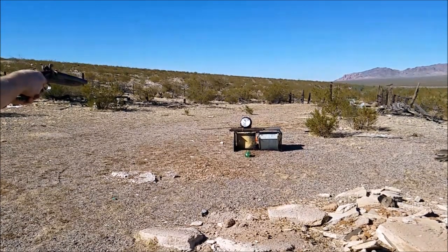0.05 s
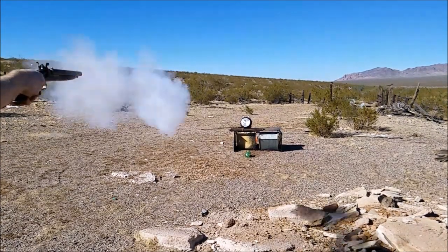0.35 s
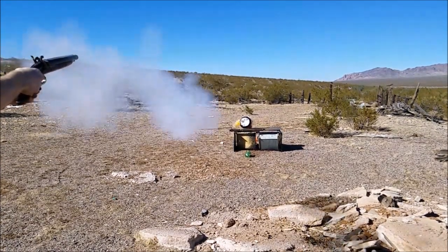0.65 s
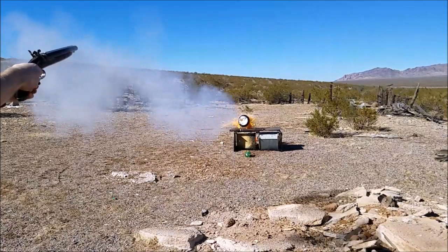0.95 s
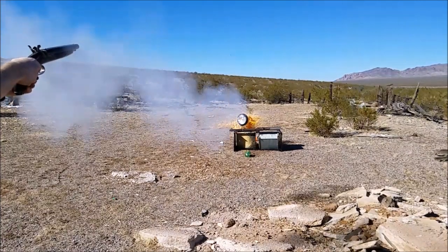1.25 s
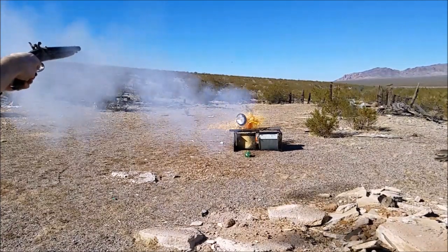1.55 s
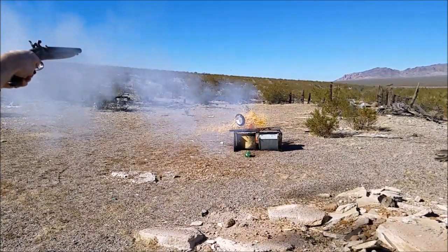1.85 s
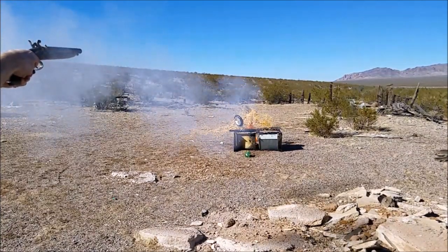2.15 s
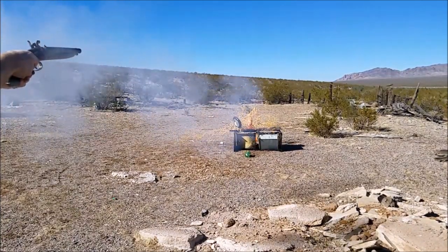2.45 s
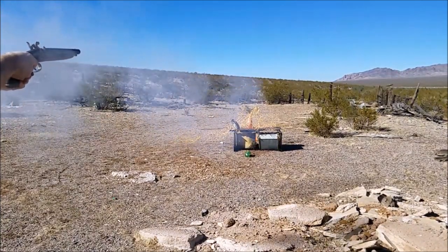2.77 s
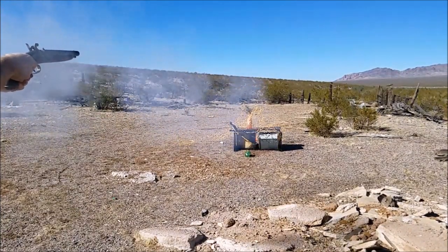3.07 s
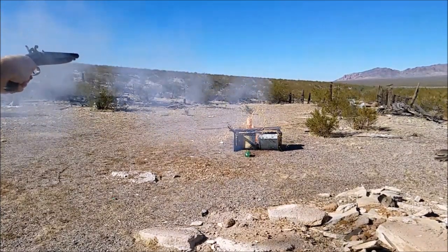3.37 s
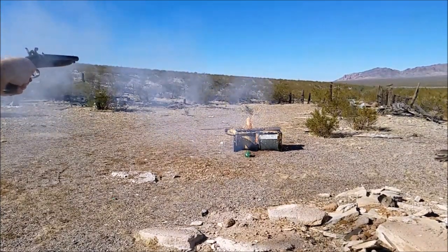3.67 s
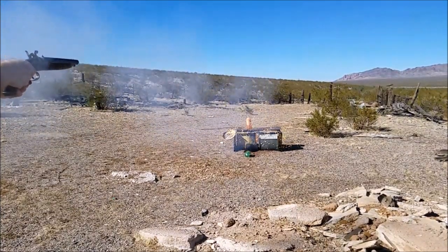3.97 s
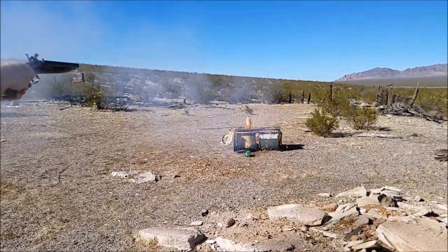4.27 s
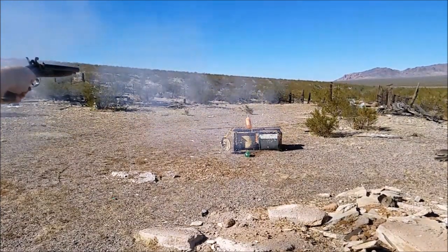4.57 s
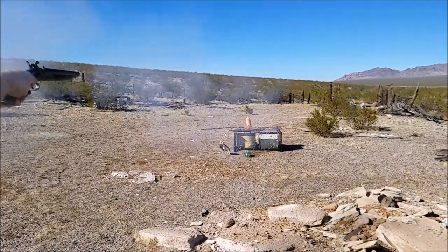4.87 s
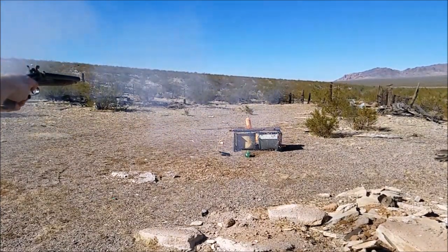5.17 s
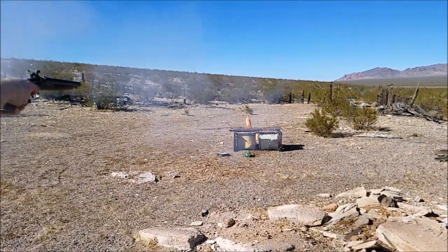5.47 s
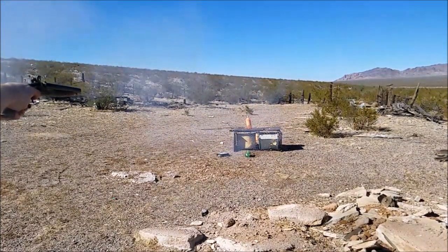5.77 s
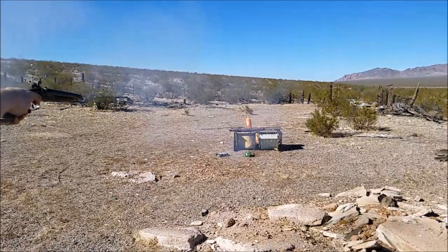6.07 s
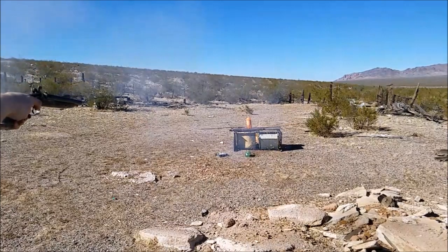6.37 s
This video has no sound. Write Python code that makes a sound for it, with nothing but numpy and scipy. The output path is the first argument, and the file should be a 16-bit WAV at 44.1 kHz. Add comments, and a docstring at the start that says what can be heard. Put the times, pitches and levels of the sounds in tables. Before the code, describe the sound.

Slowed down and dull in tone, a single pistol shot cracks and swells into a deep boom, crackling as the close microphone distorts. Wide echoes slap back across open desert and fade into a rolling tail. Afterwards come much quieter sounds: target debris knocking down with a brief hollow ring, then a few handling clicks and soft bumps above a light wind rumble.

```python
"""A sharp crack, then a long blast: a black-powder pistol on an open desert range, in slow motion.
Bursts of powder gas overload the microphone; echoes come back from rocks and scrub and roll away.
Debris from the target knocks down, the pistol clicks and bumps in the hand, and light wind rumbles.
Slow motion puts the whole scene below about 2.6 kHz; only overload crackle and faint hiss lie above."""
import sys
import numpy as np
from scipy import signal
from scipy.fft import rfft, irfft, next_fast_len
from scipy.io import wavfile

SR = 44100
rng = np.random.default_rng(int(sys.argv[2]) if len(sys.argv) > 2 else 0)


def to_wav(sig):
    """Store sig (one row per channel, or 1-D mono) as 16-bit WAV at the path in sys.argv[1].

    Samples outside -1..1 are clipped; the rate is SR.
    """
    pcm = np.clip(np.atleast_2d(sig), -1, 1) * 32767
    pcm = np.round(pcm).astype(np.int16)
    wavfile.write(sys.argv[1], SR, pcm.T)  # frames by channels


N = 292383
TIME = np.arange(N) / SR
SHOT_S = 0.401
BASS_EDGE_HZ, TREBLE_EDGE_HZ, SLOW_EDGE_HZ = 150, 1000, 2560

# tone of hard knocks and clicks: (frequency [Hz], level [dB])
HARD_COLOUR = [(20, -15), (60, 0), (115, -11), (150, 6.5), (230, -11), (300, -3), (400, -8.5), (550, -6),
               (850, -11), (1200, -25.5), (1700, -17), (2400, -20)]
# tone of wind and hand noise: (frequency [Hz], level [dB])
SOFT_COLOUR = [(20, 1.5), (65, 2.5), (115, -11), (300, -14.5), (600, -23), (900, -29.5), (1250, -29),
               (1800, -18), (2450, -17.5)]
# stereo image of the shot and its echoes: (frequency [Hz], left-right correlation)
SHOT_IMAGE = [(25, 0.8), (85, 0.13), (140, -.5), (250, -.08), (600, -.05), (2500, -0.52)]
# stereo image of small sounds and wind: (frequency [Hz], left-right correlation)
NEAR_IMAGE = [(60, 0.97), (150, 0.55), (640, 0.1), (2500, 0.13)]


def from_db(db):
    """Decibels to gain."""
    return 10 ** (np.asarray(db) / 20)


def rms_one(x):
    """Scale to unit power."""
    return x / np.sqrt(np.mean(x ** 2) + 1e-20)


def at_hz(points, hz):
    """Read a table on a log-frequency axis."""
    f, value = np.transpose(points)
    return np.interp(np.log(hz + 1e-9), np.log(f), value)


def drift(rate_hz):
    """A smooth random wobble of rms 1."""
    step, settle = 40, 2000
    pole = np.exp(-2 * np.pi * step * rate_hz / SR)
    noise = rng.standard_normal(N // step + settle + 2)
    slow = signal.lfilter([1], [1, -2 * pole, pole * pole], noise)[settle:]
    return np.interp(np.arange(N) / step, np.arange(len(slow)), rms_one(slow))


def noise_bands(colour, image, bounce=0.16, bounce_s=.0086):
    """Coloured stereo noise split into bass, body and treble, each of rms 1."""
    size = next_fast_len(N, True)
    hz = np.arange(size // 2 + 1) * SR / size
    mid, side = rfft(rng.standard_normal((2, size)))
    alike = np.clip(at_hz(image, hz), -1, 1)
    noise = np.sqrt(1 + alike) * mid + np.sqrt(1 - alike) * side * [[1], [-1]]
    noise *= from_db(at_hz(colour, hz))
    noise *= 1 + bounce * np.exp(-2j * np.pi * hz * bounce_s)   # a near reflection ripples the spectrum
    below = [1 / (1 + (hz / edge) ** 10) for edge in (18, BASS_EDGE_HZ, TREBLE_EDGE_HZ)] + [1]
    shares = np.diff(np.broadcast_arrays(*below), axis=0).clip(0) * (hz < SLOW_EDGE_HZ)
    return [rms_one(irfft(noise * np.sqrt(share), size)[:, :N]) for share in shares]


def bursts(rows, bands, bass_db, treble_db, attack, hold, bass_stretch=1, dulling_db_per_s=0):
    """Noise bursts whose attack and hold scale with their t60; brightness trades bass for treble."""
    power = np.zeros((3, N))
    for s, db, t60, bright_db in rows:
        attack_s, hold_s = 2 * attack * t60, hold * t60
        span = slice(max(0, int((s - attack_s) * SR)), int((s + hold_s + 2 * t60) * SR))
        t = TIME[span] - s
        rise = np.clip(1 + t / (attack_s + 1e-6), 0, 1) ** 2
        dulled_db = dulling_db_per_s * (s - SHOT_S)
        levels_db = (db + bass_db - bright_db, db, db + treble_db + bright_db - dulled_db)
        for k, stretch in enumerate((bass_stretch, 1, 1)):
            fall = np.exp(-np.log(1000) * np.maximum(t - hold_s, 0) / (t60 * stretch))
            power[k, span] += (from_db(levels_db[k]) * rise * fall) ** 2
    return sum(np.sqrt(p) * noise for p, noise in zip(power, bands))


def pulse(s, peak_db, hz, cycles):
    """A sine that swells to its peak in `cycles` swings and dies away, in mono."""
    out = np.zeros(N)
    span = slice(int(s * SR), int((s + 10 * cycles / hz) * SR))
    turns = np.maximum(TIME[span] - s, 0) * hz
    age = turns / cycles
    out[span] = from_db(peak_db) * np.sin(2 * np.pi * turns) * (age * np.exp(1 - age)) ** 2
    return out


def shot(turbulence_db=2.0, right_louder_db=0.4, right_lag_s=.0016):
    """The crack and the long main blast: turbulent powder gas, heard first on the left."""
    # brief swell into the crack: (time [s], level [dB], t60 [s], brightness [dB])
    lead_in = [(0.390, -33.5, .04, -5)]
    # bursts of powder gas: (time [s], level [dB], t60 [s], brightness [dB])
    blasts = [(0.401, 0.5, .02, 3), (0.407, -12, 0.073, -5), (0.440, -8.5, 0.052, -4),
              (0.461, -20, 0.32, 3), (0.569, -15.5, 0.066, 8), (0.583, -7.5, 0.081, 0),
              (0.607, -9.5, .42, -2), (0.668, -10.5, 0.1, 3.5), (0.719, -16.5, .48, -5.5)]
    # tone of the gas: (frequency [Hz], level [dB])
    colour = [(20, -10), (45, 0), (72, 1), (115, -3.5), (175, -6), (240, -1.5), (350, -6.5), (650, -12),
              (900, -15), (1200, -21.5), (1600, -11.5), (2000, -7), (2400, -9.5)]
    bands = noise_bands(colour, SHOT_IMAGE)
    swell = bursts(lead_in, bands, bass_db=-3, treble_db=-3, attack=.78, hold=.2, bass_stretch=1.6)
    gas = bursts(blasts, bands, bass_db=-5, treble_db=-2.5, attack=.018, hold=.11, bass_stretch=2)
    left, right = (swell + gas) * from_db(turbulence_db * drift(150))
    right = np.interp(TIME - right_lag_s, TIME, right, left=0)
    return np.array([left * from_db(-right_louder_db / 2), right * from_db(right_louder_db / 2)])


def pressure_waves():
    """Low waves land as thumps, high ones ring as zings."""
    # weight under the shot, its strongest echoes and hand bumps: (time [s], peak [dB], frequency [Hz])
    thumps = [(0.412, -7, 110), (0.439, -2.5, 110.6), (0.713, -12, 69.5), (0.886, -2.5, 62.3),
              (0.974, -11, 56.6), (1.032, -10, 91), (1.071, -7, 63), (1.333, -17.5, 53), (1.683, -17, 78.5),
              (4.491, -39.5, 54.4), (4.584, -41, 79), (5.775, -25.5, 52), (5.895, -36, 49.8)]
    # edge on the main blast and the loudest click: (time [s], peak [dB], rise [cycles])
    zings = [(0.565, -8.5, 16), (5.7721, -38, 7.9)]
    low = sum(pulse(s, db, hz, cycles=.66) for s, db, hz in thumps)
    high = sum(pulse(s, db, hz=2350, cycles=cycles) for s, db, cycles in zings)
    return low + high


def echoes():
    """Rocks and scrub throw the shot back; the later the echo, the more treble is lost to the air."""
    # single echoes: (time [s], level [dB], t60 [s], brightness [dB])
    slaps = [(0.884, -12, .11, -1), (1.033, -7.5, .13, -1.5), (1.080, -24, .2, 2.5),
             (1.175, -26.5, 0.22, 7.5), (1.212, -24.5, 0.098, 0), (1.316, -30, 0.064, -6),
             (1.428, -31.5, 0.041, 8), (1.500, -28.5, 0.13, -5), (1.688, -25, 0.11, 1.5),
             (1.814, -33.5, 0.11, 7.5), (1.869, -24.5, 0.039, -2.5), (1.928, -33.5, 0.085, 0.5),
             (2.273, -37.5, 0.082, 2)]
    # tone of the echoes: (frequency [Hz], level [dB])
    colour = [(20, -10.5), (45, -4), (80, -0.5), (115, -8), (170, -4.5), (230, -1.5), (330, -15),
              (450, -17.5), (650, -16), (850, -24), (1200, -35.5), (1700, -23), (2450, -27.5)]
    return bursts(slaps, noise_bands(colour, SHOT_IMAGE), bass_db=-6.5, treble_db=-1.5,
                  attack=.011, hold=.085, bass_stretch=1.7, dulling_db_per_s=14)


def rolling_report(lumps_db=1.2, band_lumps_db=1.6):
    """Countless small echoes from the desert floor merge into a lumpy tail that fades, treble first."""
    # tone of the tail: (frequency [Hz], level [dB])
    colour = [(20, -4.5), (45, 3.5), (80, -3), (115, -14), (170, -11), (270, -5), (400, -13.5), (600, -20),
              (850, -27.5), (1200, -33.5), (1600, -27), (2000, -25.5), (2450, -28)]
    # opening levels: (bass [dB], body [dB], treble [dB])
    start_db = (-20.5, -28, -29.5)
    # fade rates: (bass [dB/s], body [dB/s], treble [dB/s])
    fades = (10.5, 11.5, 22.5)
    start_s, full_s = .6, .63   # sets in with the main blast
    slopes_s, slopes_width_s, slopes_db = 2.24, .34, 3   # swells as the far slopes answer
    fade_in = np.clip((TIME - start_s) / (full_s - start_s), 0, 1)
    swell_db = slopes_db * np.exp(-((TIME - slopes_s) / slopes_width_s) ** 2)
    ride_db = lumps_db * drift(25) + swell_db
    tail = np.zeros((2, N))
    for db, fade, noise in zip(start_db, fades, noise_bands(colour, SHOT_IMAGE)):
        tail += from_db(db - fade * (TIME - full_s) + ride_db + band_lumps_db * drift(41)) * noise
    return fade_in * tail


def debris():
    """Bits of the target hit the ground with dull knocks."""
    # impacts: (time [s], level [dB], t60 [s], brightness [dB])
    knocks = [(3.164, -49.5, 0.092, -9.5), (3.721, -44, 0.22, 4)]
    return bursts(knocks, noise_bands(HARD_COLOUR, NEAR_IMAGE), bass_db=-30, treble_db=-22.5,
                  attack=.015, hold=.094, bass_stretch=1.1)


def hollow_piece(spread_rad=.21):
    """A hollow piece of the target lands and rings; its modes reach the two ears out of step."""
    # ground contacts: (time [s], level [dB])
    landings = [(3.722, -44.5), (3.741, -40)]
    # resonances of the piece: (frequency [Hz], relative level [dB], t60 [s])
    modes = [(225.4, 1.5, 0.57), (288.5, 2, 0.28), (323, -12, 0.64), (520, -7, 0.13), (810, -21, 0.2)]
    out = np.zeros((2, N))
    t = TIME[:SR]
    for s, landing_db in landings:
        at = int(s * SR)
        for hz, mode_db, t60 in modes:
            phase = 2 * np.pi * hz * t + spread_rad * np.array([[1], [-1]])
            decay = np.exp(-np.log(1000) * t / t60)
            out[:, at:at + SR] += from_db(landing_db + mode_db) * np.sin(phase) * decay
    return out


def pistol_clicks(t60=.12):
    """The pistol gives thin clicks as it is handled."""
    # clicks: (time [s], level [dB], brightness [dB])
    clicks = [(5.075, -74, 4.5), (5.542, -55.5, -1), (5.660, -78, 13.5), (5.750, -70, 12.5),
              (5.775, -47, -0.5), (6.416, -75.5, 8)]
    rows = [(s, db, t60, bright_db) for s, db, bright_db in clicks]
    return bursts(rows, noise_bands(HARD_COLOUR, NEAR_IMAGE), bass_db=-18, treble_db=2,
                  attack=.028, hold=.056, bass_stretch=1.1)


def hand_on_grip():
    """The hand bumps softly against the pistol and rustles on the grip."""
    # bassy bumps and rubs: (time [s], level [dB], t60 [s])
    touches = [(4.500, -61.5, 0.11), (4.570, -62, 0.32), (5.811, -58, 0.73), (6.510, -66, 0.58)]
    # rustle among the clicks: (time [s], level [dB], t60 [s], brightness [dB])
    rustles = [(5.74, -76, 0.83, 5.5)]
    bands = noise_bands(SOFT_COLOUR, NEAR_IMAGE)
    rows = [(s, db, t60, 0) for s, db, t60 in touches]
    bumps = bursts(rows, bands, bass_db=8.5, treble_db=-18.5, attack=.059, hold=.08)
    return bumps + bursts(rustles, bands, bass_db=0, treble_db=1, attack=.15, hold=.19)


def light_wind(gust_db=2.06):
    """An uneven rumble of wind under a faint hiss; the bed is brighter before the shot."""
    # levels of the bed: (bass [dB], body [dB], treble [dB])
    bed_db = (-64, -72, -78)
    # offsets before the shot: (bass [dB], body [dB], treble [dB])
    early_db = (-3.5, -1.5, 5.5)
    bands = noise_bands(SOFT_COLOUR, NEAR_IMAGE)
    bass, body, treble = [from_db(db + offset * (TIME < SHOT_S)) * noise
                          for db, offset, noise in zip(bed_db, early_db, bands)]
    return (bass + body) * from_db(gust_db * drift(5)) + treble


def scene():
    """The shot and its echoes, then debris and handling, over a bed of wind."""
    report = shot() + pressure_waves() + echoes() + rolling_report()
    return report + debris() + hollow_piece() + pistol_clicks() + hand_on_grip() + light_wind()


def record(dry, overload=0.99, hardness=24, hiss_db=-98, cutoff_hz=19000):
    """The microphone overloads, slow motion leaves the low band, and overshoots clip into crackle."""
    size = next_fast_len(N + SR // 10, True)
    hz = np.arange(size // 2 + 1) * SR / size
    squashed = dry / (1 + (dry / overload) ** 12) ** (1 / 12)
    low_band = np.clip((SLOW_EDGE_HZ + 30 - hz) / 70, 0, 1)
    muffled = irfft(rfft(squashed, size) * low_band, size)[:, :N]
    clipped = muffled / (1 + np.abs(muffled) ** hardness) ** (1 / hardness)
    hiss = from_db(hiss_db) * rms_one(signal.lfilter([1], [1, -.4], rng.standard_normal((2, N))))
    return signal.sosfilt(signal.cheby2(12, 60, cutoff_hz, fs=SR, output="sos"), clipped + hiss)


dry = scene()
out = record(dry)
to_wav(out)
```